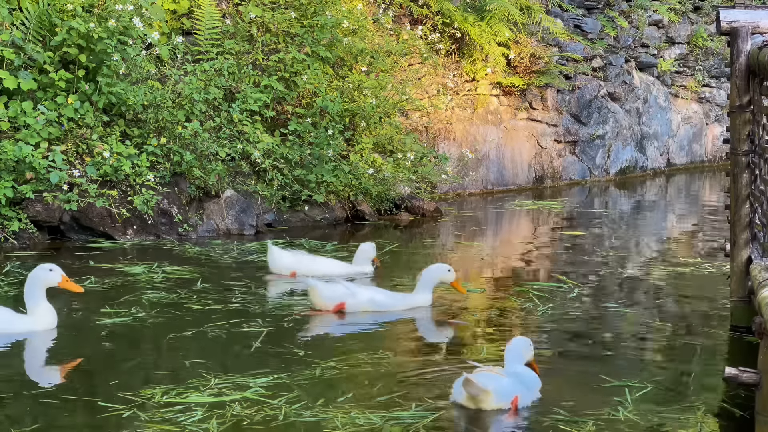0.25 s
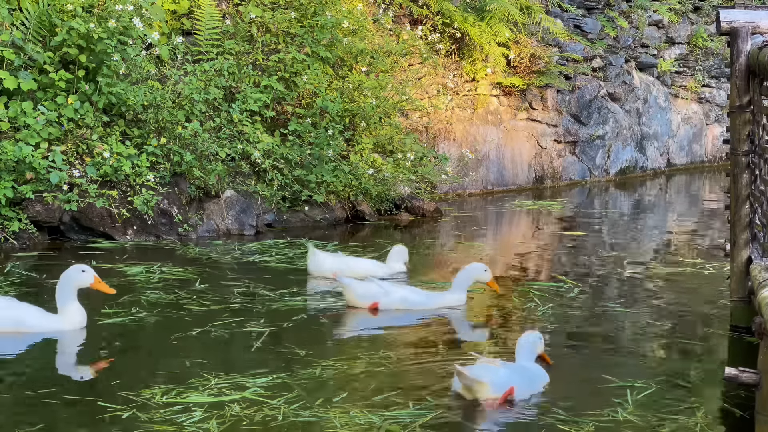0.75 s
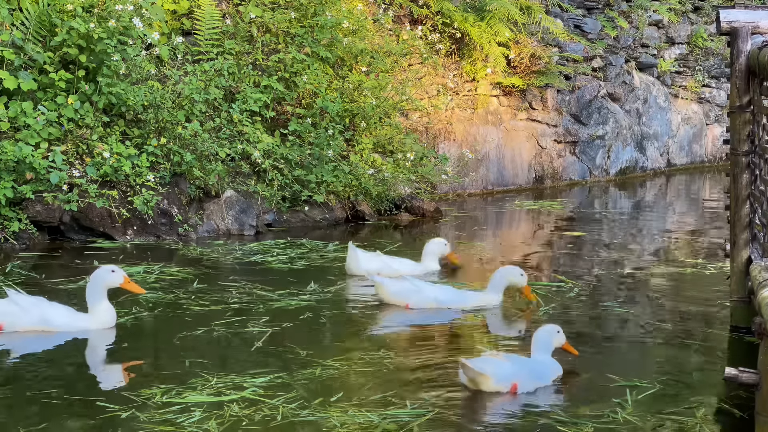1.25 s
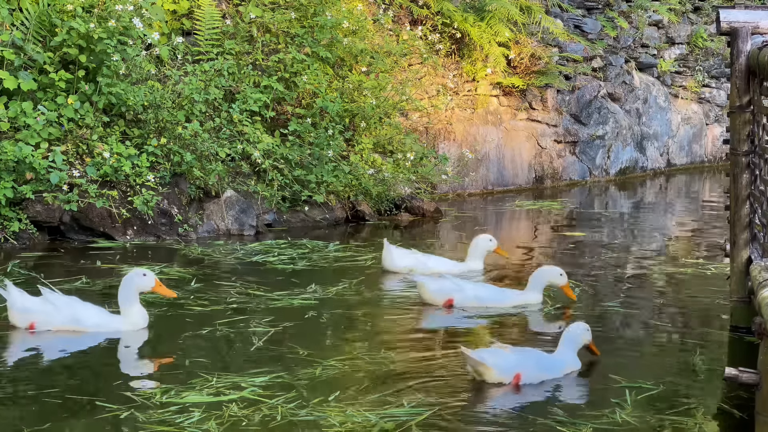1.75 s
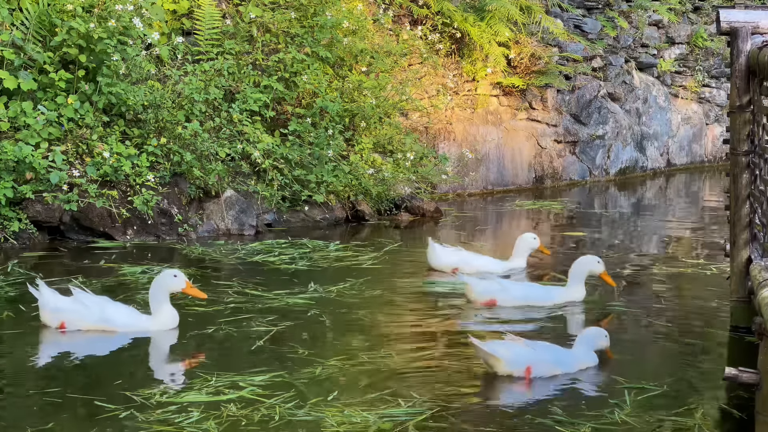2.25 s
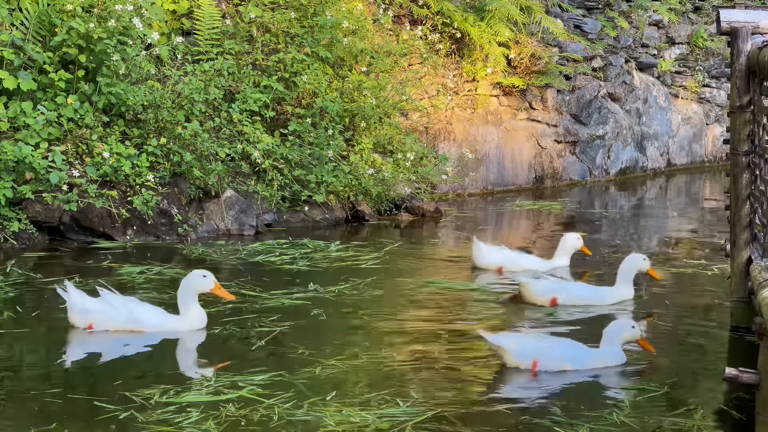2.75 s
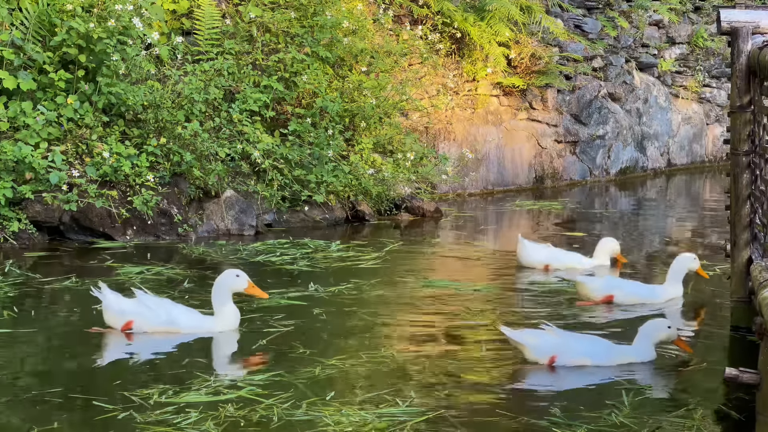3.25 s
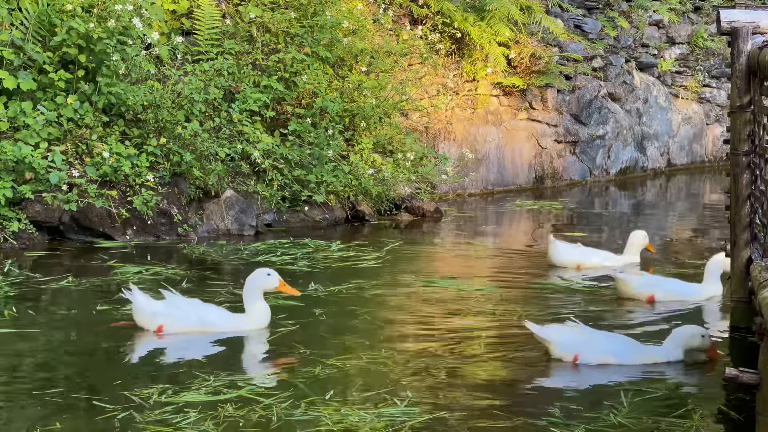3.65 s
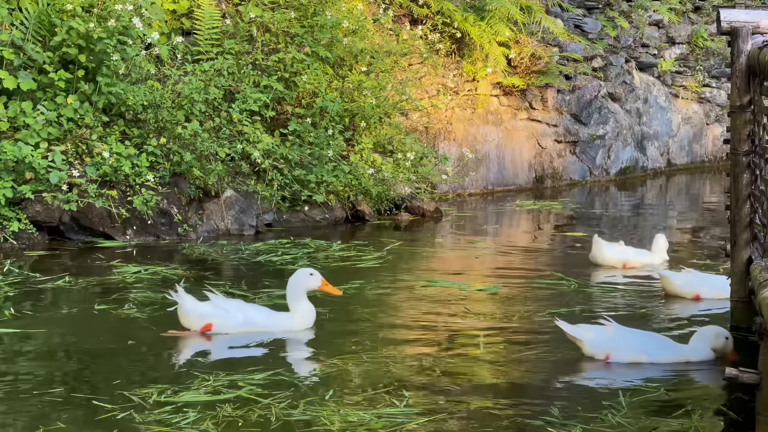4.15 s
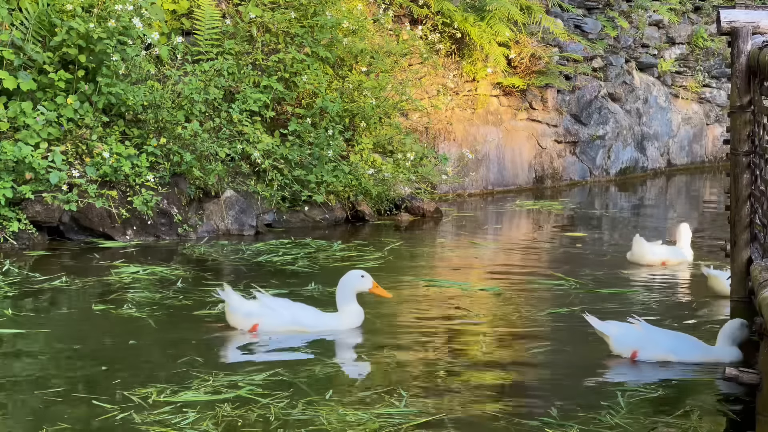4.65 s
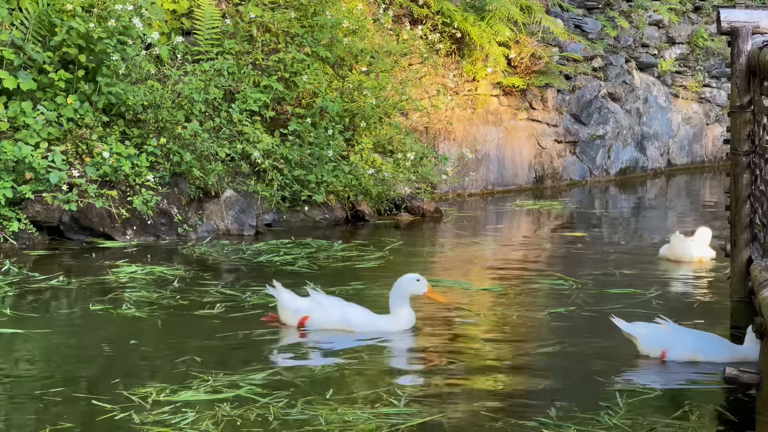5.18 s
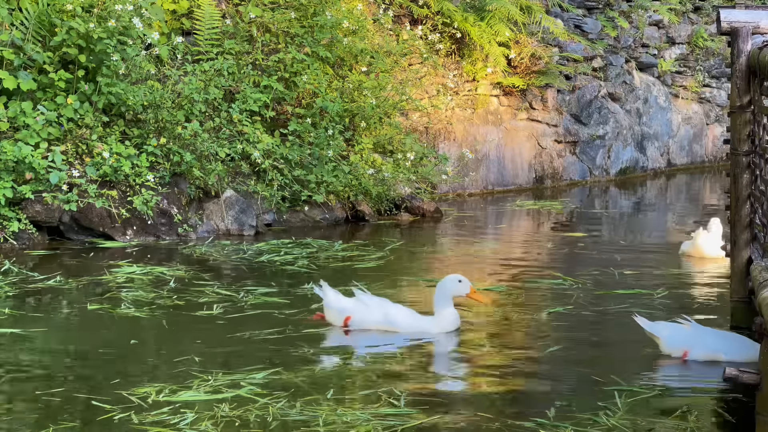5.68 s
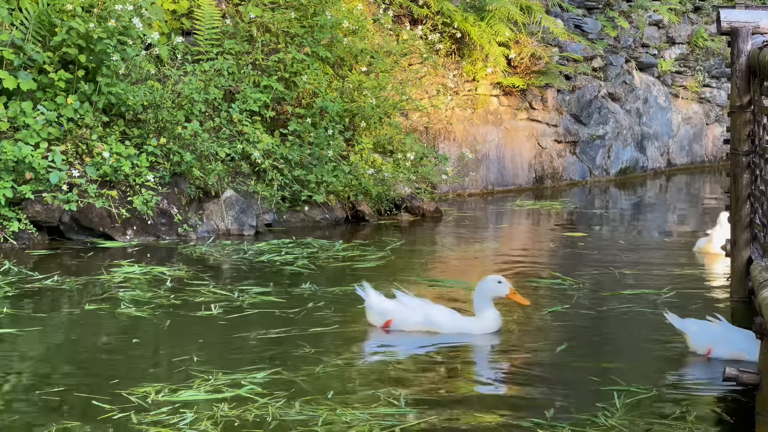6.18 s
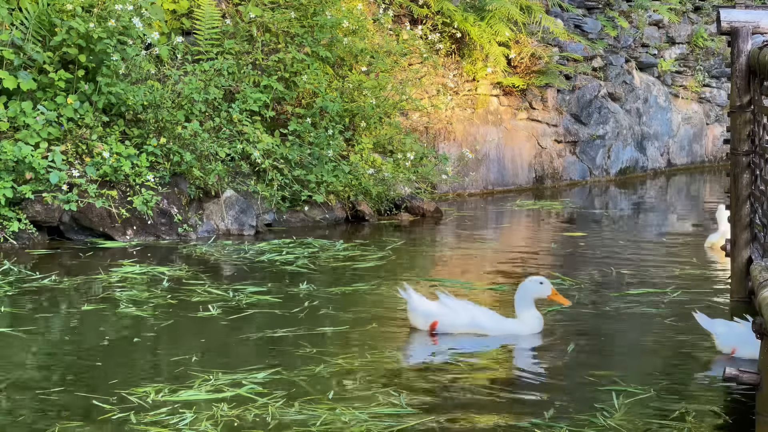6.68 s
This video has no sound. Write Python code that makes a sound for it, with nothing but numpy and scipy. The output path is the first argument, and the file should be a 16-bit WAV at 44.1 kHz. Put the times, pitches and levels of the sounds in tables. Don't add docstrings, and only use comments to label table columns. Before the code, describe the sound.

Water trickles steadily into a small pond with plinking drops and low gurgles as ducks paddle, while a near cricket trills continuously.

```python
import sys
import numpy as np
from scipy import signal
from scipy.fft import rfft, irfft, next_fast_len
from scipy.io import wavfile

SR = 44100
rng = np.random.default_rng(int(sys.argv[2]) if len(sys.argv) > 2 else 0)


def inscribe(sig):
    pcm = np.round(np.clip(np.atleast_2d(sig).T, -1, 1) * 32767)
    wavfile.write(sys.argv[1], SR, pcm.astype(np.int16))


def gain_from_db(level_db):
    decades = np.asarray(level_db, float) / 20
    return 10 ** decades


N = 305245
TIME = np.arange(N) / SR
TINY_EDGE_HZ = 1840

# (time [s], peak [dB], pitch [Hz])
PLINKS = [(0.1257, -37, 2090), (0.381, -31, 2440), (0.4458, -39.5, 2314), (0.8339, -40, 2180),
          (1.0091, -36.5, 2330), (1.0257, -39.5, 1860), (1.274, -37, 2030), (1.529, -37.5, 2180),
          (1.605, -35.5, 2270), (1.956, -38, 2250), (1.9788, -37.5, 2020), (2.1007, -38, 2320),
          (2.3389, -39, 1860), (2.7008, -36.5, 2400), (3.3489, -35.5, 2370), (3.597, -31, 2270),
          (4.2632, -36, 2040), (4.7974, -39, 2547), (4.8855, -39.5, 2140), (5.065, -30, 2302),
          (5.5426, -36, 2660), (6.366, -37.5, 2170)]
# (time [s], peak [dB], pitch [Hz])
PLIPS = [(0.1407, -31, 2840), (0.3278, -33.5, 4200), (0.9047, -30, 2800), (1.041, -33, 3320),
         (2.244, -35.5, 4220), (2.284, -33.5, 2726), (2.9993, -31.5, 2750), (3.034, -35, 4100),
         (3.0988, -29, 2710), (3.2879, -39, 2760), (3.5973, -33, 4100), (3.6672, -30, 3560),
         (4.0499, -35.5, 2770), (4.165, -35.5, 4460), (4.556, -33, 3830), (4.7664, -34.5, 3490),
         (5.026, -38, 3593), (5.1138, -33.5, 2762), (5.2083, -33.5, 2690), (5.2433, -34, 4240),
         (5.672, -38, 3490), (5.702, -35.5, 4200), (6.0157, -33, 4120), (6.2852, -33.5, 3930),
         (6.4402, -35.5, 4084), (6.49, -35, 4330), (6.8353, -35, 3700)]


def in_time(rows):
    s, *columns = np.transpose(rows)
    return [np.interp(TIME, s, c) for c in columns]


def at_hz(points, hz):
    knots_hz, db = np.array(points).T[:2]
    return np.interp(np.log(hz), np.log(knots_hz), db)


def rms_one(x):
    return x / np.sqrt(np.mean(x ** 2) + 1e-20)


def band(x, low_hz, high_hz):
    return signal.sosfilt(signal.butter(2, [low_hz, high_hz], "band", fs=SR, output="sos"), x)


def above(x, edge_hz):
    return signal.sosfilt(signal.butter(6, edge_hz, "high", fs=SR, output="sos"), x)


def drift(rate_hz):
    r = np.exp(-64 * np.pi * rate_hz / SR)
    coarse = rng.standard_normal(N // 32 + 2001)
    slow = signal.lfilter([1], [1, -2 * r, r * r], coarse)[2000:]
    return np.repeat(rms_one(slow), 32)[:N]


def swells(s, peak_db, rise_db_per_s, fall_db_per_s):
    after = TIME[::64] - s[:, None]
    slope_db = np.minimum(rise_db_per_s * after, -fall_db_per_s * after)
    return gain_from_db(peak_db[:, None] + slope_db) ** 2


def wavering_tone(hz, db):
    return np.sqrt(2) * gain_from_db(db + 2.6 * drift(23.0)) * np.sin(2 * np.pi * np.cumsum(hz) / SR)


def ring(clicks, hz, cycles):
    r, w = gain_from_db(-60 * hz / (cycles * SR)), 2 * np.pi * hz / SR
    return signal.lfilter([0, np.sin(w)], [1, -2 * r * np.cos(w), r * r], clicks + 1e-18)


def bubbles(pitches, strength_db, per_s, cycles, spread_db, clump_db):
    clumps = gain_from_db(clump_db * (drift(20.0) + 0.8 * drift(6.0)))
    born = np.flatnonzero(rng.random(N) < per_s * clumps / SR)
    chance = rng.random((len(born), 3))
    spreads = np.minimum(-np.log(chance[:, 0]), 1.5)
    sizes = gain_from_db(spread_db * spreads) * np.sign(chance[:, 1] - .5)
    dealt = (chance[:, 2] * len(pitches)).astype(int)
    out = 0
    for k, hz in enumerate(pitches):
        clicks, mine = np.zeros(N), born[dealt == k]
        clicks[mine] = sizes[dealt == k] * gain_from_db(strength_db(hz, mine))
        out = out + ring(clicks, hz, cycles)
    return rms_one(out)


def add(out, s, peak_db, hz, cycles, rise, attack_cycles, pan_db=0):
    cycles = max(cycles, 2)
    turn = np.arange(int(cycles * SR / hz)) * hz / SR
    shape = (1 - np.exp(-turn / attack_cycles)) * gain_from_db(-60 * turn / cycles)
    sweep = np.sin(2 * np.pi * turn * (1 - 2 * rise + rise * turn / 2))
    wave = gain_from_db(peak_db) * shape / shape.max() * sweep
    at = round(s * SR)
    out[:, at:at + len(wave)] += gain_from_db(np.array([[pan_db / 2], [-pan_db / 2]])) * wave[:N - at]


def trickle(hiss_db, stir_db, patchy_db):
    # (frequency [Hz], density [dB per Hz])
    colour = [(35, -35), (60, -9), (180, -11), (600, -8.5), (1150, -5), (1300, -10), (1750, -5.5),
              (2200, -1), (3800, -7.5), (5600, -8.5), (8000, -8.5), (10300, -6), (12300, -25.5),
              (15500, -17.5)]
    # (frequency [Hz], likeness [0-1])
    likeness = [(60, 0.9), (150, 0.85), (400, 1), (1300, 0.62), (2000, 0.8)]
    out, fine, together = np.zeros((2, N)), np.zeros(N), drift(12.0)
    edges = 35 * 2 ** np.arange(0, 8.9, .4)
    white = rng.standard_normal((2, 2, N))
    for k, (low, high) in enumerate(zip(edges, edges[1:])):
        hz = np.sqrt(low * high)
        stirred = stir_db * np.interp(hz, [100, 300, 1400, 2200], [0.22, 0.38, 0.52, 0.012])
        gain = gain_from_db(at_hz(colour, hz) + stirred + patchy_db * (0.28 * together + drift(37.0)))
        if high > 2200:
            fine += gain * band(white[k % 2, 0], low, high)
            continue
        mid, side = gain * band(white[k % 2], low, high)
        alike = np.clip(at_hz(likeness, hz), 0, 1)
        out += np.sqrt((1 + alike) / 2) * mid + np.sqrt((1 - alike) / 2) * side * [[1], [-1]]
    out += above(fine, TINY_EDGE_HZ)
    return gain_from_db(hiss_db - 5.5) * out / np.std(band(out[0], 1700, 5000))


def spray(settle_s):
    s, peak_db = np.transpose(PLINKS + PLIPS)[:2]
    thrown = np.zeros(N)
    thrown[(s * SR).astype(int)] = gain_from_db(peak_db + 36)
    return signal.lfilter([1], [1, -np.exp(-1 / (settle_s * SR))], thrown + 1e-18)


def fizz(fizz_db):
    # (pitch [Hz], level [dB])
    strength = [(1200, -4), (2300, 0.5), (4000, 1), (5600, -5), (8800, -3), (10500, 5), (12500, 4.5)]
    small = bubbles(np.geomspace(1300, 12500, 48), lambda hz, at: at_hz(strength, hz),
                    per_s=650 * (1 + 3.0 * spray(settle_s=.025)), cycles=39, spread_db=8.5, clump_db=3.0)
    mist = bubbles(np.geomspace(7600, 11500, 12), lambda hz, at: 0,
                   per_s=130, cycles=41, spread_db=3.0, clump_db=3.5)
    crackle = bubbles([3600], lambda hz, at: 0,
                      per_s=45 * (1 + 3 * spray(settle_s=.04)), cycles=2.9, spread_db=8.5, clump_db=4.0)
    return gain_from_db(fizz_db - 2.0) * small + gain_from_db(-61.5) * mist + gain_from_db(-64) * crackle


def drops():
    # (time [s], peak [dB], pitch [Hz])
    ticks = [(0.7056, -31, 7600), (1.5287, -26, 8930), (1.714, -42, 8600), (2.918, -37, 8900),
             (3.214, -29, 9570), (3.159, -43, 7310), (3.9644, -34, 10950), (4.2784, -33, 7320),
             (4.583, -37, 8870), (4.724, -38, 8860), (4.8052, -35, 8900), (5.1817, -37.5, 8890),
             (5.245, -36, 7200), (5.5184, -39, 8900), (5.681, -37.5, 8860), (5.7483, -42, 8700),
             (6.092, -39, 8960), (6.262, -36.5, 8800), (6.6266, -36, 10810), (6.835, -40.5, 8300)]
    # (time [s], peak [dB], pitch [Hz])
    drips = [(0.1391, -48.5, 2400), (0.141, -45, 5776.0), (0.139, -41, 3820), (0.1984, -42, 3500),
             (0.2187, -44.5, 2200), (0.3261, -47, 5260), (0.3834, -40.5, 3500), (0.4764, -47, 1930),
             (0.7315, -45.5, 2180), (0.9073, -46, 3330), (1.2188, -44, 5950), (1.2734, -44, 2869.0),
             (1.3189, -43, 5600), (1.3827, -48, 3520), (1.604, -51, 2720), (1.792, -42, 3965),
             (1.9264, -46, 1810), (2.2854, -45, 2440), (2.3388, -43.5, 2416), (2.4813, -44.5, 1920),
             (2.4976, -45, 4060), (2.571, -44, 2718.0), (2.77, -43, 5125), (2.8133, -44, 4260),
             (2.999, -44, 3455), (3.0353, -48, 2060), (3.1218, -43, 2540), (3.1824, -47, 2050),
             (3.1887, -45, 2750), (3.3769, -47, 2310), (3.5998, -38, 3935), (3.6149, -44, 2956),
             (3.6745, -44, 4850), (3.69, -45, 2252), (4.4448, -42.5, 3400), (4.4915, -45, 2130),
             (4.5535, -47, 3235.0), (4.562, -45, 4200), (4.623, -44, 2336.0), (4.738, -44, 2320.0),
             (4.8511, -43, 2630), (5.0644, -45.5, 4464), (5.244, -52, 3400), (5.7769, -46, 2370),
             (5.8084, -45, 2304.0), (5.949, -40.5, 4360), (6.0777, -46, 2888), (6.3614, -43, 5297.0),
             (6.5697, -42.7, 3730),
             (0.9717, -48, 1990), (1.0944, -53, 2950), (1.3189, -45, 1840), (1.3344, -46.5, 2350),
               (1.735, -48, 2040), (1.8352, -46, 2280), (1.8816, -51, 2020), (2.0293, -45.5, 2970),
               (5.906, -49, 1940)]
    # (time [s], peak [dB], pitch [Hz])
    specks = [(0.0897, -43, 7550), (0.0964, -45, 9103.0), (0.2978, -42, 11331.0), (0.3877, -43, 8600),
              (0.5549, -46, 8700), (0.56, -43.5, 7450), (0.5947, -42.5, 8400), (0.6971, -47, 9000),
              (1.0094, -41, 10900), (1.337, -45, 8650), (1.459, -42.5, 8850), (1.5727, -42, 11288.0),
              (1.6985, -45.3, 11374.0), (1.725, -43.5, 8820), (2.357, -44, 7700), (2.396, -45, 8866.0),
              (2.4973, -45, 11256.0), (2.6678, -46, 8690), (2.711, -41, 8700), (2.9184, -40, 10900),
              (3.222, -41, 8680), (3.2403, -41, 11300), (3.275, -43.7, 8540), (3.572, -43.9, 8500),
              (3.6793, -44.7, 11358.0), (3.7209, -43, 7530), (4.043, -43.5, 8839.0), (4.1474, -40, 11440),
              (4.164, -48, 8700), (4.2522, -46, 8694.0), (4.2785, -44, 9300), (4.338, -43.5, 7370),
              (4.5543, -41, 7820), (4.584, -41, 10900), (4.7666, -46, 8746), (4.804, -48, 8360),
              (4.8865, -44.6, 11100), (5.0076, -43, 11164.0), (5.0637, -45, 11019.0), (5.1314, -43, 9000),
              (5.1385, -43, 9011.0), (5.1582, -46, 9100), (5.2443, -41, 8700), (5.3039, -43, 11100),
              (5.333, -39, 10730), (5.4762, -44, 11100), (5.543, -48, 7811.0), (5.7774, -43.9, 9566.0),
              (5.7909, -44, 10700), (5.849, -46, 8500), (6.1222, -44, 11500), (6.2117, -47, 11230),
              (6.3224, -43.8, 8800), (6.5729, -47, 7746.0), (6.6256, -48, 8700), (6.7633, -43, 7504.0),
              (6.8474, -44, 8500)]
    out = np.zeros((2, N))
    for falls, crack_db in ((PLINKS, -10), (PLIPS, -10.5)):
        for s, peak_db, hz in falls:
            add(out, s, peak_db - 3.0, hz, 30., rise=0.0051, attack_cycles=0.86)
            for crack_hz in (2320, 3070, 4100, 6200):
                add(out, s, peak_db + crack_db, crack_hz, 12., rise=0, attack_cycles=0.84)
    for s, peak_db, hz in ticks:
        add(out, s, peak_db + 0.5, hz, 46., rise=0.00086, attack_cycles=3.7)
        for crack_hz in (4200, 6360, 9570, 10400, 13400):
            add(out, s, peak_db - 7.5, crack_hz, 22., rise=0, attack_cycles=0.99)
    for s, peak_db, hz in drips:
        add(out, s, peak_db + 3.0, hz, 34, rise=0.0041, attack_cycles=1.4)
    for s, peak_db, hz in specks:
        add(out, s, peak_db + 3.5, hz, 89, rise=0.00024, attack_cycles=0.92)
        add(out, s, peak_db - 4, hz * 0.63, 14., rise=0, attack_cycles=0.4)
    return out


def air_pockets():
    # (time [s], peak [dB], pitch [Hz], ring [cycles])
    gurgles = [(0.289, -41.5, 534, 290), (0.712, -36.5, 517, 24), (0.749, -46.5, 528, 59),
               (0.865, -63, 446, 31), (0.905, -50, 534, 35), (1.058, -43, 529, 160),
               (1.146, -42.5, 587, 31), (1.238, -47, 574, 36), (1.275, -52, 590, 40),
               (1.751, -43.5, 453, 33), (1.755, -46, 595, 60), (2.032, -46, 409.6, 27),
               (2.411, -46, 687, 35), (2.698, -40.5, 581, 92), (2.845, -43, 513, 36), (2.892, -44, 502, 47),
               (3.076, -48.5, 376, 35.3), (3.15, -42.5, 374, 13), (3.292, -44, 595, 47),
               (3.479, -45, 502, 17.4), (4.018, -38.5, 959, 28), (4.056, -39, 494, 31),
               (4.405, -37, 608, 62), (5.023, -38, 622, 71), (5.129, -36.5, 592, 56),
               (6.012, -37, 595, 24.4), (6.239, -45, 562, 36)]
    # (time [s], peak [dB], pitch [Hz])
    blips = [(0.017, -47, 840), (0.212, -47, 927), (0.427, -45, 930), (1.33, -52, 588), (1.492, -44, 840),
             (2.608, -51, 487), (2.266, -55, 553), (2.702, -48, 920), (4.715, -42.5, 767),
             (2.26, -46.5, 1027), (2.608, -44, 1073), (2.781, -46.5, 972), (3.584, -42.5, 1100),
             (4.137, -40, 896), (4.457, -43, 1068), (4.691, -47, 1007), (6.878, -50, 1027)]
    # (time [s], peak [dB], pitch [Hz])
    burbles = [(0.0876, -47, 670), (0.1404, -51, 1120), (0.2358, -48, 660), (0.4392, -47, 607),
               (0.5109, -49, 519), (1.2684, -55, 1000), (1.9496, -49.5, 930), (1.9511, -50, 646),
               (2.1494, -49, 858), (2.4067, -51, 784), (2.4547, -50.5, 604), (2.4759, -45, 1469),
               (3.3109, -48.5, 847), (3.4275, -52, 376), (3.5163, -47, 1080), (4.114, -48, 475),
               (4.192, -48, 617), (4.982, -50, 670), (4.5516, -46, 1330), (4.6911, -47, 667),
               (4.7746, -53, 403), (4.8804, -43.5, 1105), (5.3676, -51.5, 623), (6.0848, -52.5, 429),
               (6.1618, -53, 650),
               (2.043, -53, 754), (2.999, -48, 534), (3.077, -49, 634), (3.154, -48, 733), (3.179, -52, 1110),
             (3.304, -48, 515), (5.606, -59, 713), (5.733, -54, 774), (5.824, -57, 990)]
    # (time [s], peak [dB], pitch [Hz])
    plops = [
        (0.805, -58, 858),
        (1.097, -51.5, 900),
        (6.02, -51, 750),
    ]
    # (time [s], peak [dB], pitch [Hz])
    chirps = [(0.044, -45.5, 724), (0.11, -49, 760), (0.587, -50, 1073), (1.163, -51, 1060),
              (1.276, -50, 997), (1.292, -43.5, 1640), (1.819, -48.5, 1256), (2.11, -45.5, 1422),
              (4.286, -45, 1440), (2.873, -48.5, 980), (2.926, -48, 919), (3.543, -53.5, 894),
              (4.704, -46, 1790), (4.719, -54, 890), (4.82, -53, 936)]
    out = np.zeros((2, N))
    ringing = gurgles + [(*b, 88) for b in blips] + [(*b, 60) for b in burbles]
    for s, peak_db, hz, cycles in ringing:
        pan_db = -3 * np.log2(hz / 480)
        add(out, s, peak_db - 3.5, hz, cycles, rise=0.00344, attack_cycles=1.13, pan_db=pan_db)
    for s, peak_db, hz in plops:
        add(out, s, peak_db + 4.0, hz, 64, rise=0.02, attack_cycles=1.3, pan_db=-3)
    for s, peak_db, hz in chirps:
        add(out, s, peak_db + 0.5, hz, 60., rise=0.0064, attack_cycles=0.28, pan_db=-5.5)
    return out


def glug():
    # (time [s], pitch [Hz], level [dB])
    note = [(0.7, 520, -65), (0.712, 517, -56), (0.846, 497, -62), (0.868, 432, -54), (0.94, 576.6, -73),
            (1.036, 564, -55), (1.338, 575, -71), (1.354, 670, -66), (1.38, 560, -73)]
    sounding = (TIME > note[0][0]) * (TIME < note[-1][0])
    return gain_from_db(-6.5 + 4.5 * drift(29.9)) * wavering_tone(*in_time(note)) * sounding


def paddling():
    # (time [s], slosh [dB], pitch of the air pockets stirred [Hz])
    kicks = [(0.0, -48, 750), (.3, -54.5, 530), (.43, -52.5, 590), (.85, -68.5, 527), (1.1, -58.5, 593),
             (1.27, -61.5, 620), (1.54, -68, 875), (1.82, -62.5, 607), (2.08, -62, 820), (2.38, -65, 870),
             (2.68, -55, 746), (2.82, -54, 584), (2.95, -50.5, 525), (3.1, -55, 466.7), (3.23, -54, 457),
             (3.36, -66, 444), (3.5, -58.5, 478), (3.922, -65, 638), (4.07, -50.5, 539.4), (4.2, -59, 684),
             (4.48, -56.5, 780), (4.76, -55, 716), (5.04, -60, 767), (5.3, -56.5, 830), (6.02, -61.5, 654),
             (6.22, -62.5, 610), (6.44, -61.5, 564), (6.881, -71, 647)]
    s, peak_db, hz = np.transpose(kicks)
    power = swells(s, peak_db, rise_db_per_s=67, fall_db_per_s=110)
    total = power.sum(axis=0)
    slosh_db = 10 * np.log10(total + gain_from_db(2 * -75))
    return np.repeat([slosh_db, hz @ power / total], 64, axis=1)[:, :N]


def slosh(slosh_db, pocket_hz):
    churn = bubbles(np.geomspace(340, 1250, 30), lambda hz, at: -8 * np.abs(np.log2(hz / pocket_hz[at])),
                    per_s=300, cycles=49, spread_db=5.5, clump_db=2.5)
    return gain_from_db(slosh_db - 3.0) * band(churn, 290, 2400)


def bill_snap():
    # (time [s], peak [dB], decay by 60 dB [s])
    s, peak_db, t60 = (1.5288, -21, 0.02)
    after = TIME - s
    decay = gain_from_db(peak_db - 60 * np.abs(after) / t60) * (after > 0)
    return decay * band(rng.standard_normal(N), 7700, 10000)


def rock_echo(x, wet_db, dull_hz):
    dull = signal.sosfilt(signal.butter(2, dull_hz, fs=SR, output="sos"), x)
    lags = (np.sort(rng.uniform(0.00398, .06, 12)) * SR).astype(int)
    out = np.zeros((2, N))
    for k, lag in enumerate(lags):
        lean_db = np.roll([[0], [-4.]], k)
        out[:, lag:] += gain_from_db(wet_db - 250 * lag / SR + lean_db) * dull[:-lag] * rng.choice([-1, 1])
    return out


def cricket(beat, voice, wobble_db):
    # (time from the top [ms], loudness [0-1], pitch offset [Hz])
    wing = [
        (-11, 0.05, -91),
        (-7.0, 0.6, -70),
        (-1, 0.75, -9.5),
        (2.5, 0.87, -35.5),
        (2.5, 1, -120),
        (5.5, 0.05, -230),
    ]
    s, number = np.transpose(beat)
    count = np.interp(TIME, s, number, left=number[0] - .5, right=number[-1] + .5)
    stroke = np.clip(np.round(count), number[0], number[-1])
    index = (stroke - number[0]).astype(int)
    chance = rng.standard_normal((index.max() + 1, 3))[index]
    ms = 1000 * (TIME - np.interp(stroke, number, s)) + .5 * chance[:, 0]
    knots, loudness, offset_hz = np.transpose(wing)
    hz, peak_db = in_time(voice)
    phase = 2 * np.pi * np.cumsum(hz + np.interp(ms, knots, offset_hz) + 5 * chance[:, 1]) / SR
    swell = np.interp(ms, knots, loudness, left=0, right=0)
    song = gain_from_db(peak_db + wobble_db * chance[:, 2]) * swell * np.sin(phase)
    return song + gain_from_db(-13.0) * np.roll(song, round(.0085 * SR))


def near_cricket():
    # (time [s], wing stroke number)
    beat = [(0.3036, -9), (0.7023, 0), (1.3614, 15), (2.6862, 45), (4.0111, 75), (5.3309, 105),
            (6.6475, 135)]
    # (time [s], pitch [Hz], peak [dB])
    voice = [(.3, 6270, -69), (.4, 6410, -66), (0.48, 6470, -49), (.57, 6556, -54), (.66, 6626, -47),
             (0.703, 6713, -43.5), (3.5, 6680, -42.5), (6.66, 6750, -43.5)]
    return cricket(beat, voice, wobble_db=1.43)


def far_cricket():
    # (time [s], wing stroke number)
    bouts = [
        [(.048, 0), (1.285, 26)],
        [(5.042, 0), (6.898, 39)],
    ]
    # (time [s], pitch [Hz], peak [dB])
    voice = [(0, 7120, -49), (1.3, 7100, -46), (5.0, 7070, -42), (5.4, 7090, -48.5), (6.92, 7140, -41)]
    return sum(cricket(b, voice, wobble_db=2.0) for b in bouts) * gain_from_db(-6 + 2.5 * drift(90.0))


def chorus():
    # (frequency [Hz], width [Hz], level [dB])
    singers = [
        (6850, 250, -74),
        (7197, 500, -60),
    ]
    out = 0
    for hz, width, db in singers:
        throng = rms_one(band(rng.standard_normal(N), hz - width / 2, hz + width / 2))
        out = out + gain_from_db(db + 1.5 * drift(28.0)) * throng
    return out


def distant_motor():
    # (time [s], level [dB])
    hum = [(.33, -62), (.65, -70), (1.001, -69.5), (1.76, -66), (2.5, -57), (2.87, -56), (3.4, -64.5),
           (3.93, -62), (4.42, -68.5), (4.76, -66), (5.0, -68), (5.1, -75), (5.75, -60), (6.12, -62),
           (6.65, -60.5), (6.9, -69)]
    # (time [s], pitch [Hz])
    hum_pitch = [(0, 73.0), (1.5, 73.1), (2.1, 74.4), (2.9, 76.66), (6.92, 76.07)]
    # (time [s], pitch [Hz], level [dB])
    whine = [
        (4.25, 95.7, -94),
        (4.6, 109, -73),
        (4.9, 103, -80),
    ]
    total = swells(*np.transpose(hum), rise_db_per_s=53, fall_db_per_s=38.5).sum(axis=0)
    total = total + gain_from_db(2 * -92)
    hum_db = np.interp(TIME, TIME[::64], 10 * np.log10(total)) - 13.5 * (TIME > 5.12)
    return wavering_tone(*in_time(hum_pitch), hum_db) + wavering_tone(*in_time(whine)) * (TIME < 4.9)


def scene():
    # (time [s], hiss [dB], fizz [dB])
    flow = [
        (0, -52, -54),
        (1.5, -51, -53),
        (3.6, -52, -53.5),
        (4.5, -50, -51.5),
        (5.25, -52, -57.5),
        (5.6, -52.5, -59),
        (6.0, -51, -53.5),
        (6.92, -51.5, -56),
    ]
    hiss_db, fizz_db = in_time(flow)
    slosh_db, pocket_hz = paddling()
    fine = above(fizz(fizz_db) + drops() + bill_snap(), TINY_EDGE_HZ)
    water = fine + air_pockets() + glug() + slosh(slosh_db, pocket_hz)
    echo = rock_echo(water.mean(axis=0), wet_db=-11.5, dull_hz=5000)
    bed = trickle(hiss_db, slosh_db - slosh_db.mean(), patchy_db=3.5)
    insects = near_cricket() + far_cricket() + chorus()
    return water + echo + bed + insects + distant_motor()


def starve(mid, side):
    # (frequency [Hz], sum [dB], difference [dB])
    floor = [(0, -90, -90), (1880, -90, -90), (1960, -90, -7), (2600, -90, -5), (5000, -90, -8),
             (8750, -90, -7), (8900, -90, -24), (9500, -16, -24), (11800, -22, -22), (13300, -13.5, -23),
             (14500, -24, -24), (22050, -24, -24)]
    hz, _, spectra = signal.stft([mid, side], SR, nperseg=1024)
    power = np.abs(spectra[:, :512]) ** 2
    power = np.repeat(power.reshape(2, 64, 8, -1).mean(axis=2), 8, axis=1)
    edges, *limits_db = np.transpose(floor)
    near_9k = power[0, 200:208].mean()
    limit = np.array([gain_from_db(2 * np.interp(hz[:512], edges, db)) for db in limits_db]) * near_9k
    spectra[:, :512] *= power > limit[:, :, None]
    return signal.istft(spectra, SR, nperseg=1024)[1][:, :N]


def top_cut(x):
    return signal.sosfilt(signal.butter(12, 16470, fs=SR, output="sos"), x)


def record(dry):
    # (frequency [Hz], phase [rad])
    port_lead = [(0, 0), (430, -.62), (1460, -1.05), (2150, -.33), (8700, -.22), (9130, -1.2),
                 (9730, -2.25), (10130, -2.75), (10280, -3.14), (10430, -3.55), (10700, -3.9),
                 (11700, -5.9), (12200, -5.7), (22050, -5.5)]
    # (frequency [Hz], gain [dB])
    top = [(0, -0.5), (11000, 1.5), (12000, -5.5), (13000, -6), (13300, -22), (14400, -25), (14550, -9),
           (15700, 4), (15850, -64), (22050, -60)]
    size = next_fast_len(N + 4096)
    hz = np.fft.rfftfreq(size, 1 / SR)
    turn = np.exp(.5j * np.interp(hz, *np.transpose(port_lead)) * np.array([[1], [-1]]))
    gain = gain_from_db(np.interp(hz, *np.transpose(top)))
    left, right = irfft(rfft(dry, size) * turn * gain, size)[:, :N]
    mid, side = starve((left + right) / 2, (left - right) / 2)
    return top_cut(np.array([mid + side, mid - side]))


dry = scene()
out = record(dry)
inscribe(out)
```